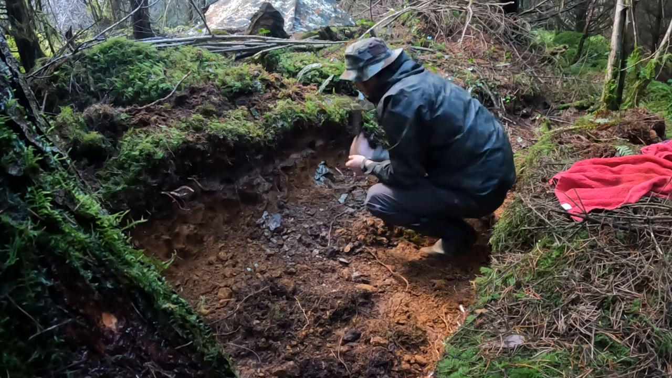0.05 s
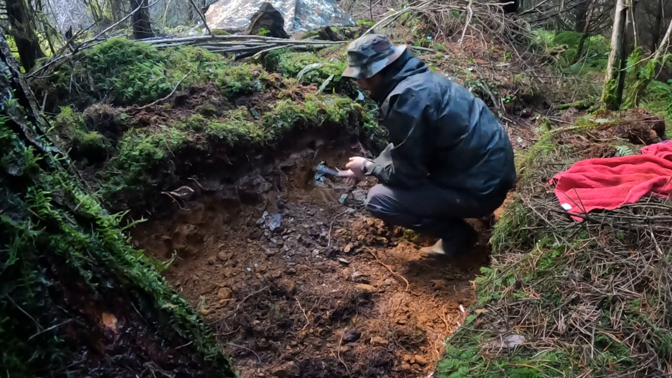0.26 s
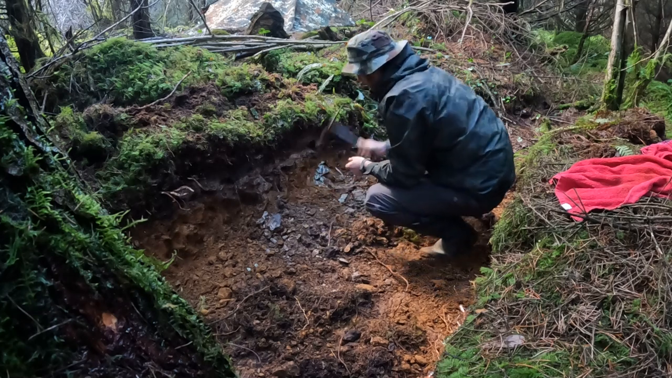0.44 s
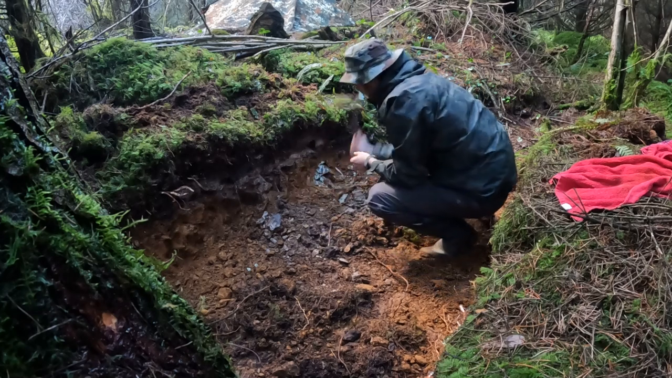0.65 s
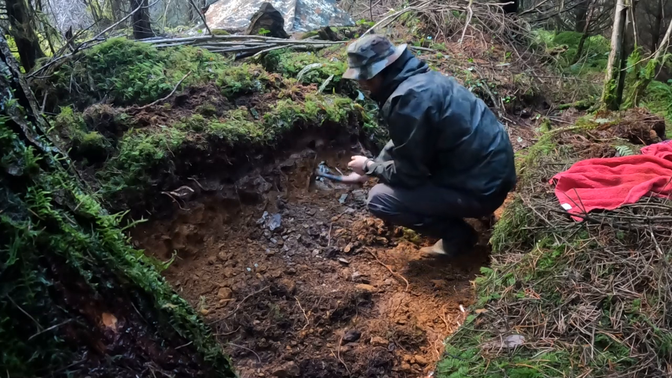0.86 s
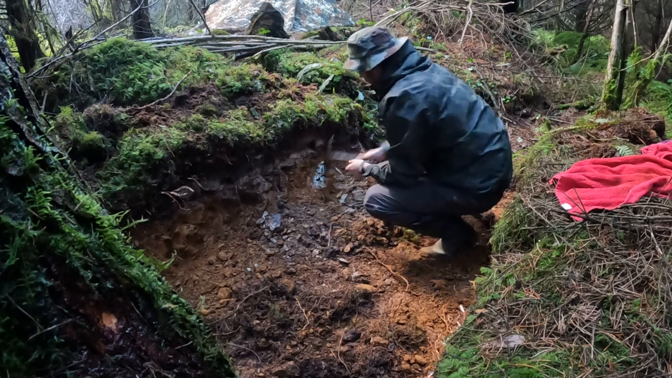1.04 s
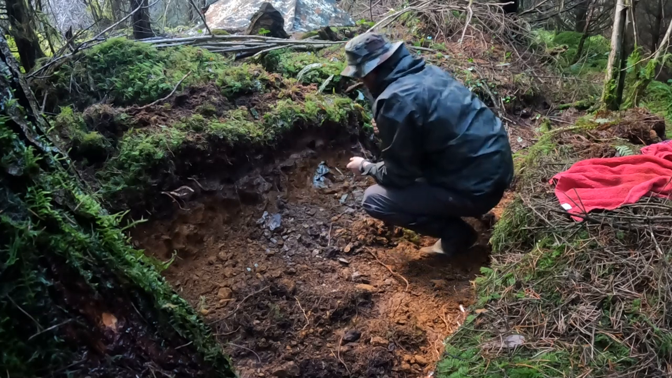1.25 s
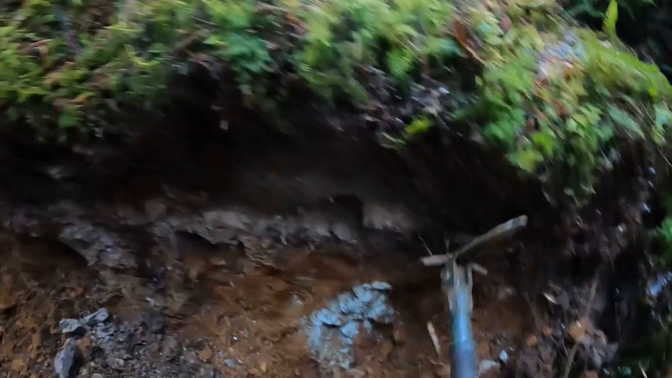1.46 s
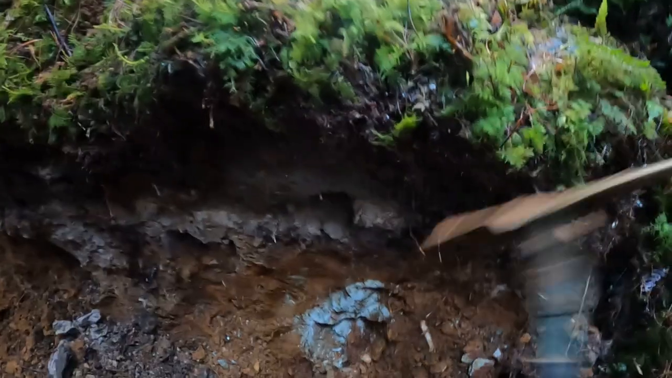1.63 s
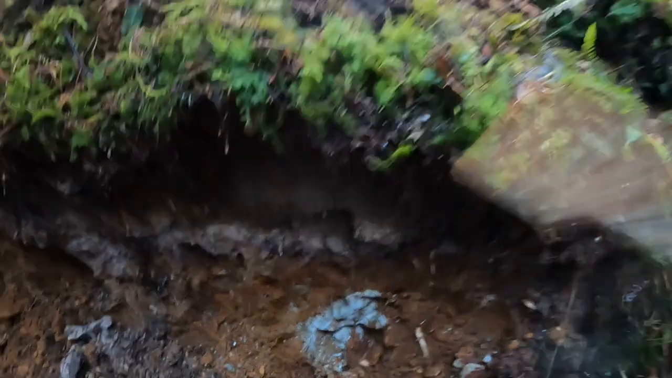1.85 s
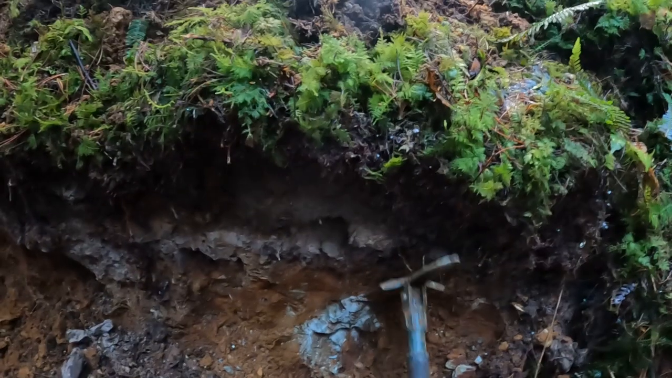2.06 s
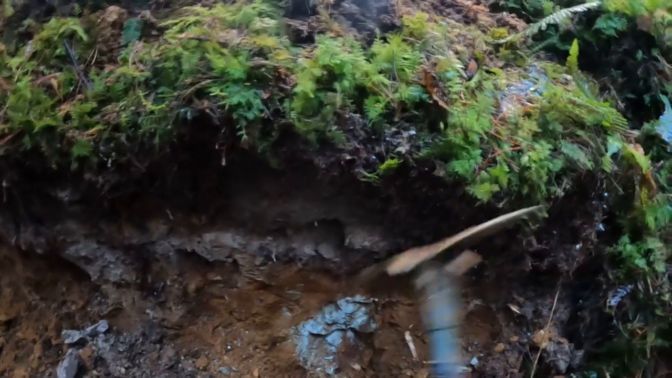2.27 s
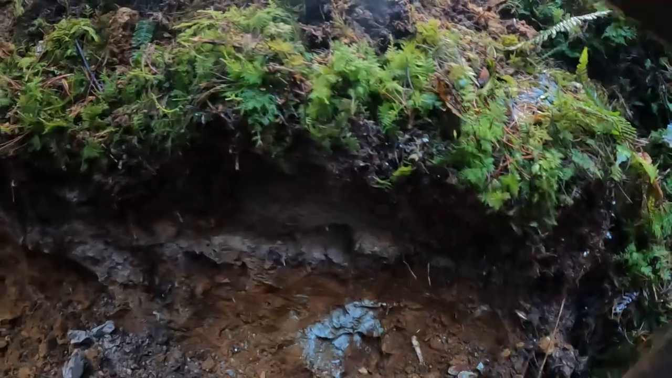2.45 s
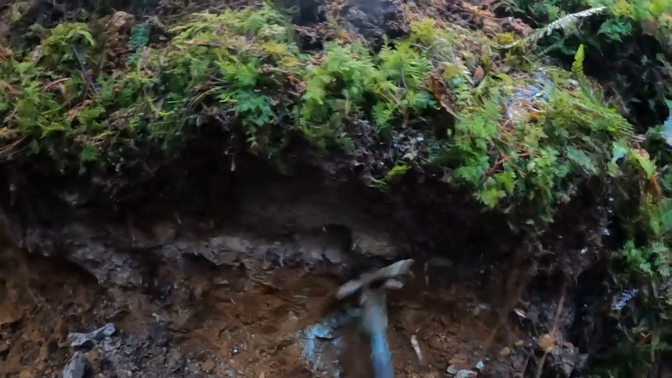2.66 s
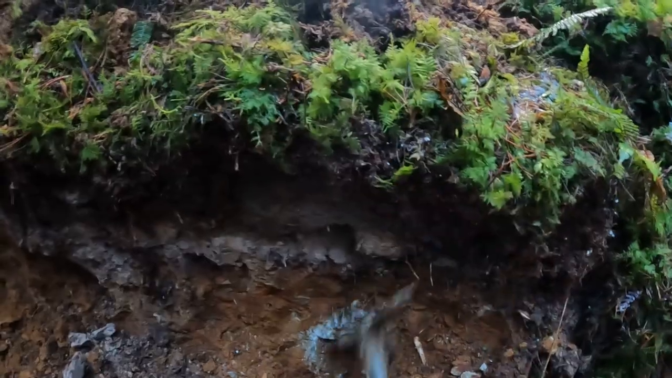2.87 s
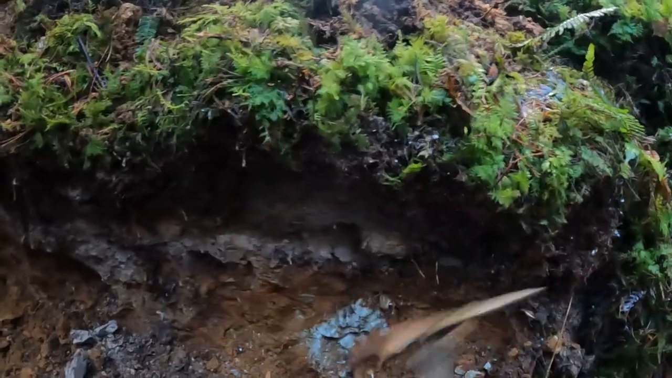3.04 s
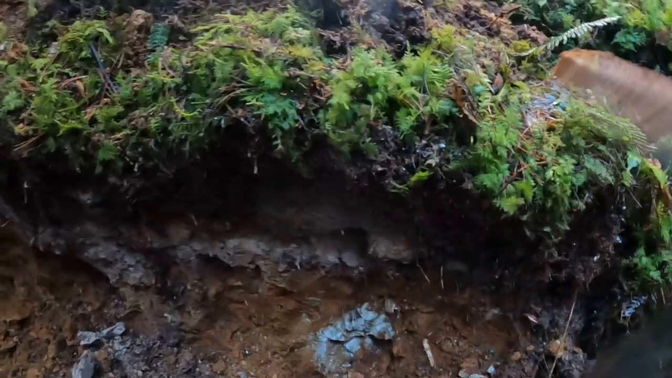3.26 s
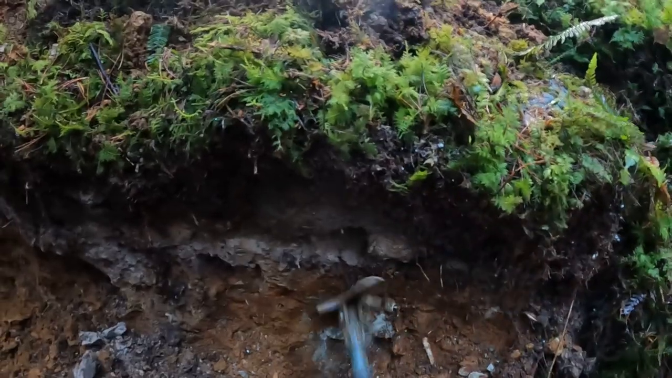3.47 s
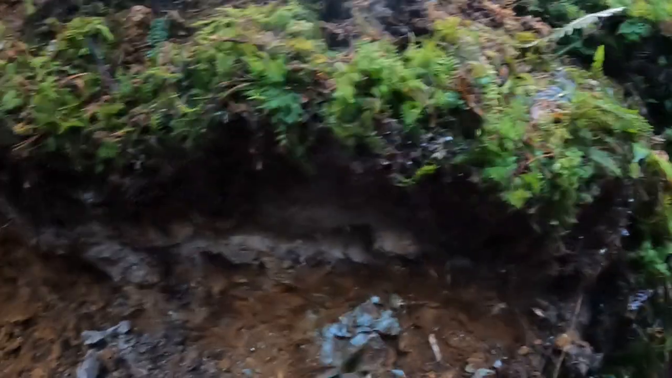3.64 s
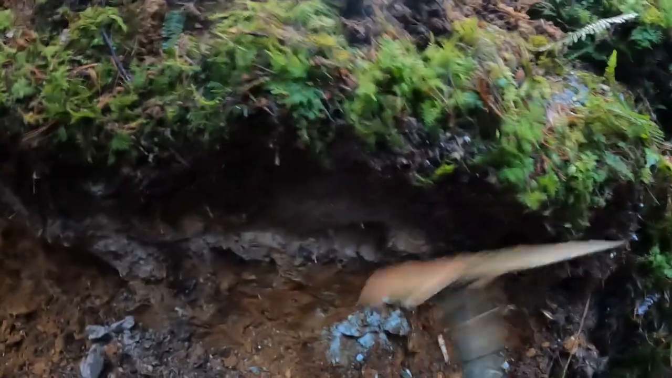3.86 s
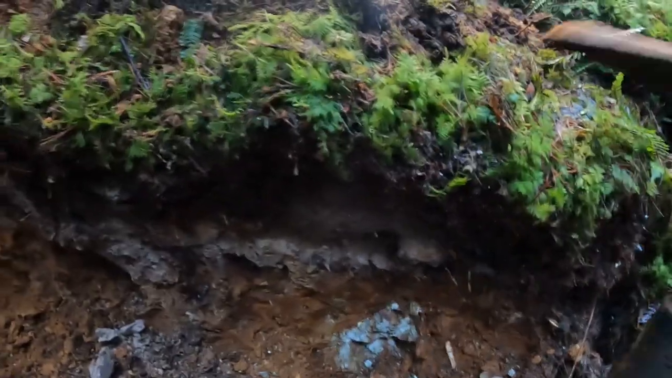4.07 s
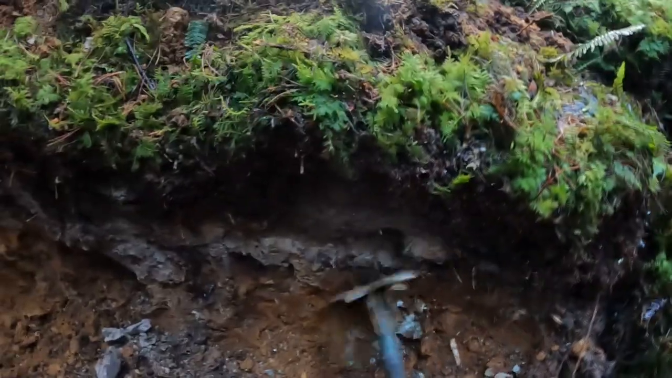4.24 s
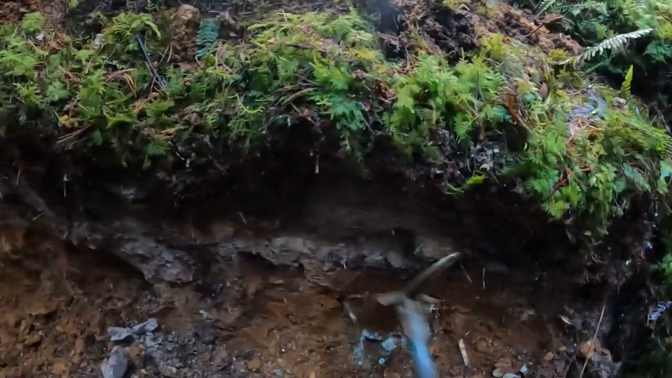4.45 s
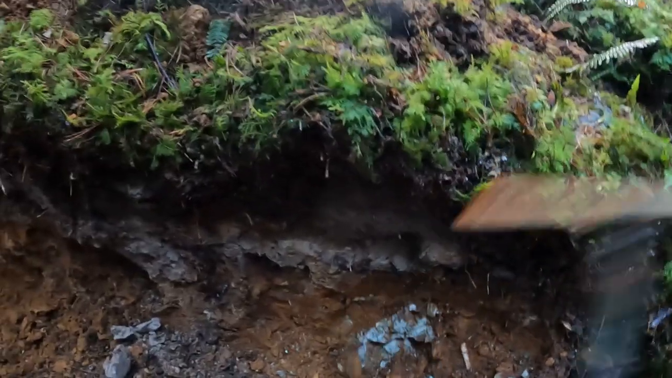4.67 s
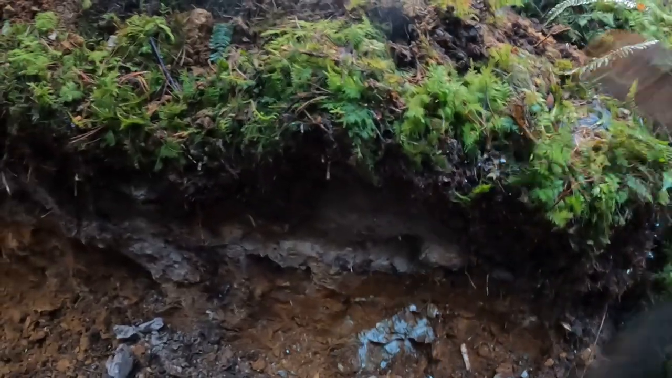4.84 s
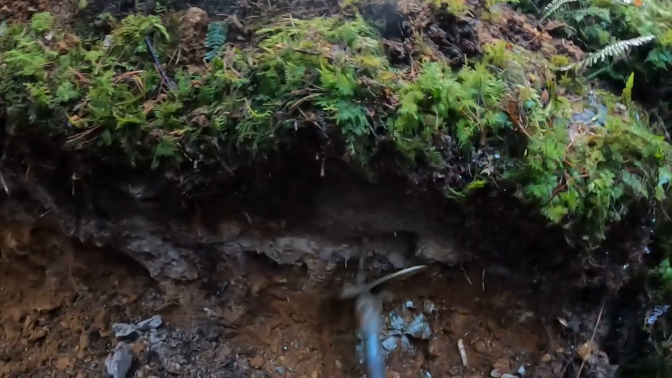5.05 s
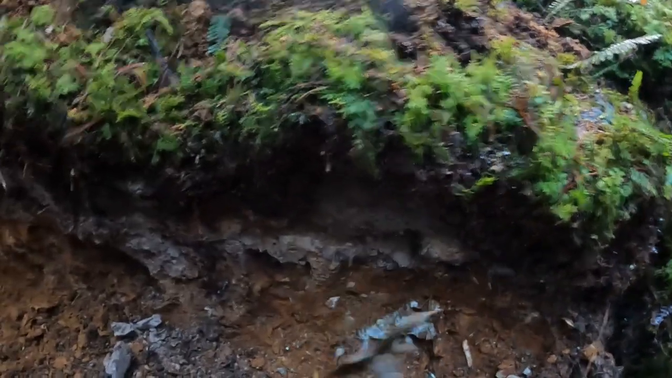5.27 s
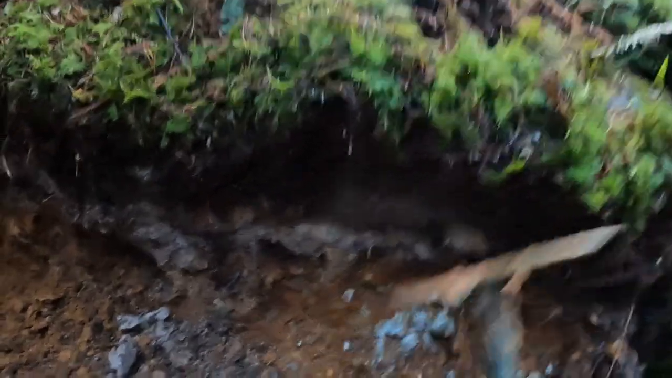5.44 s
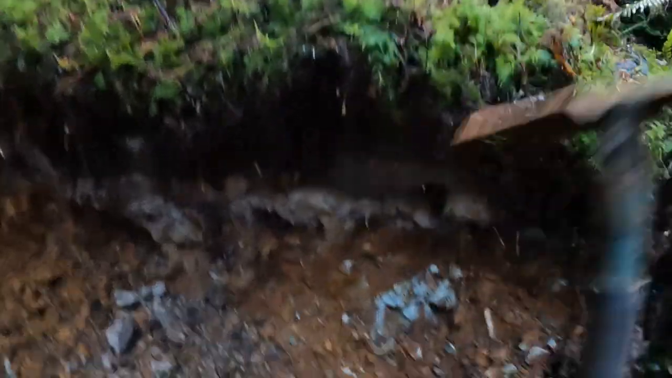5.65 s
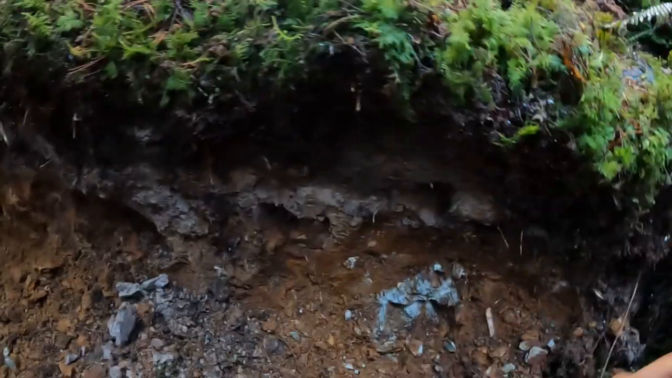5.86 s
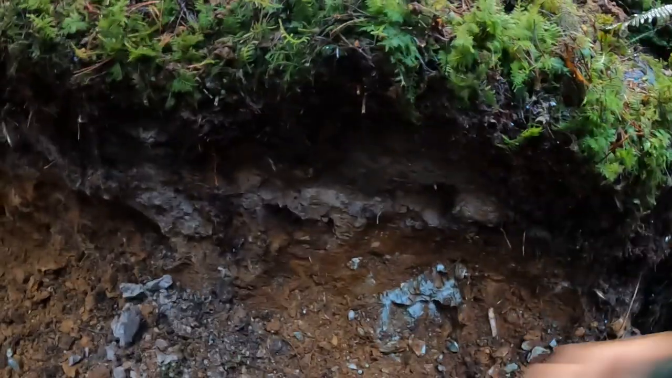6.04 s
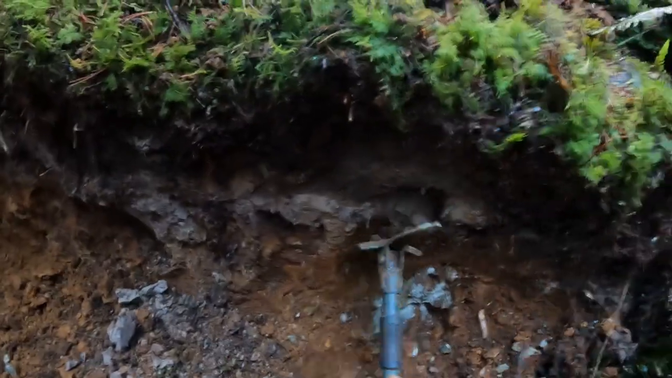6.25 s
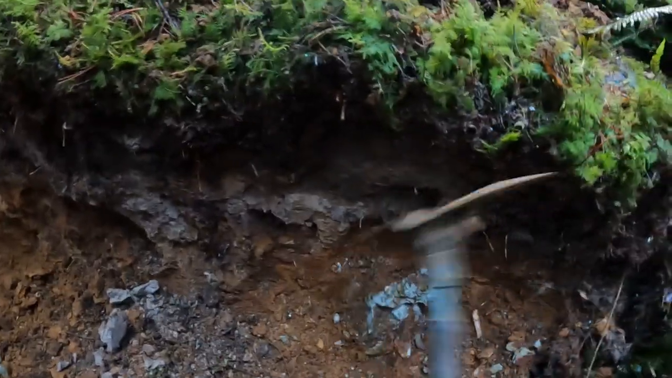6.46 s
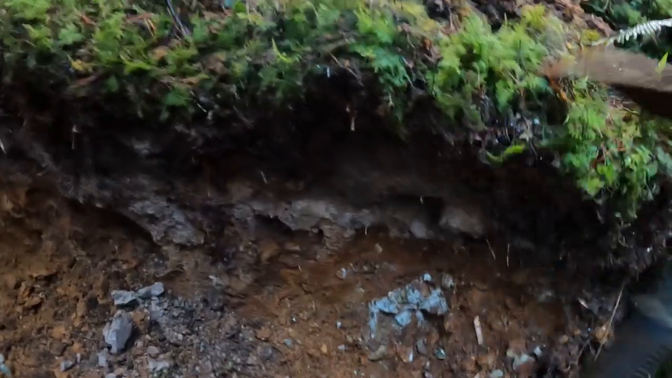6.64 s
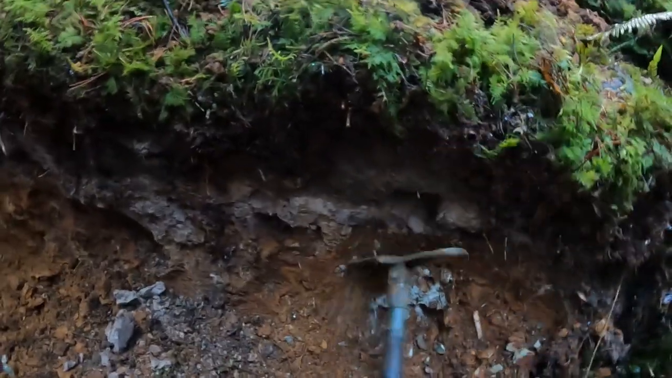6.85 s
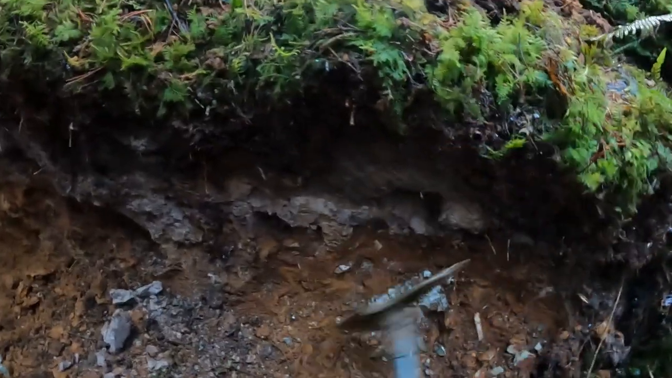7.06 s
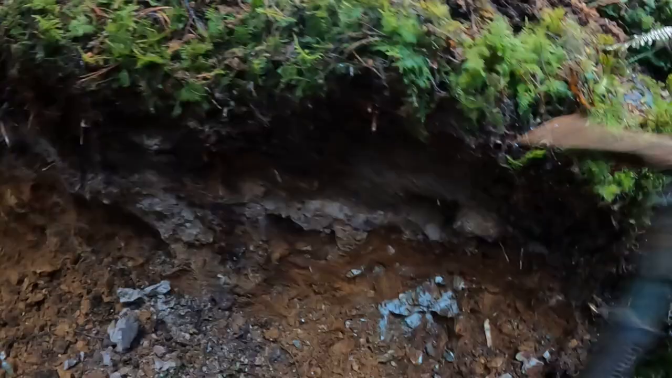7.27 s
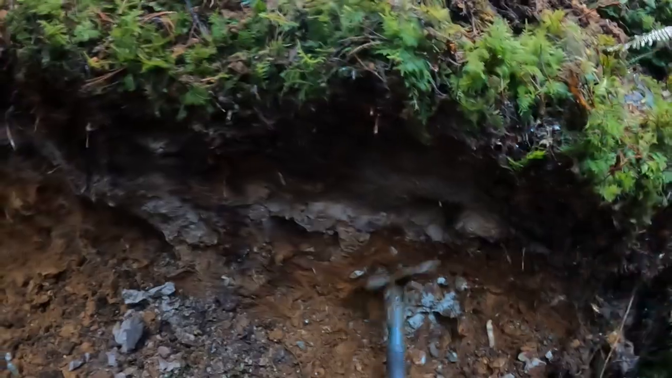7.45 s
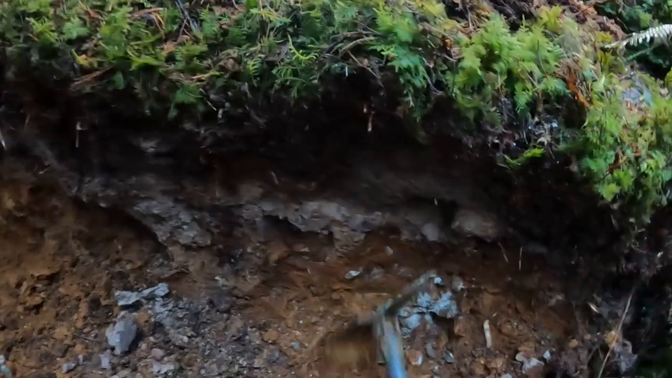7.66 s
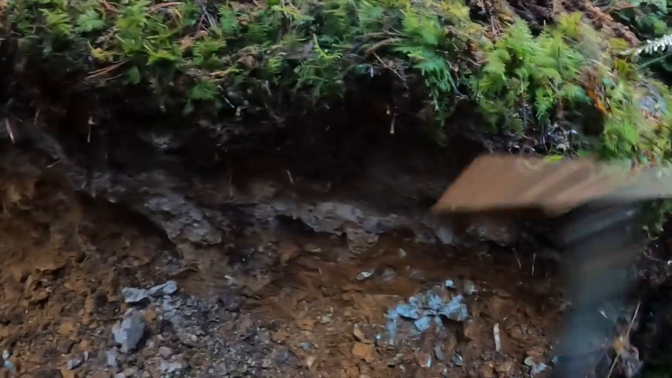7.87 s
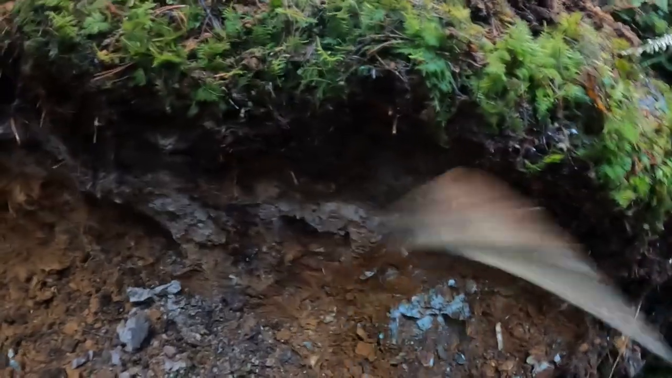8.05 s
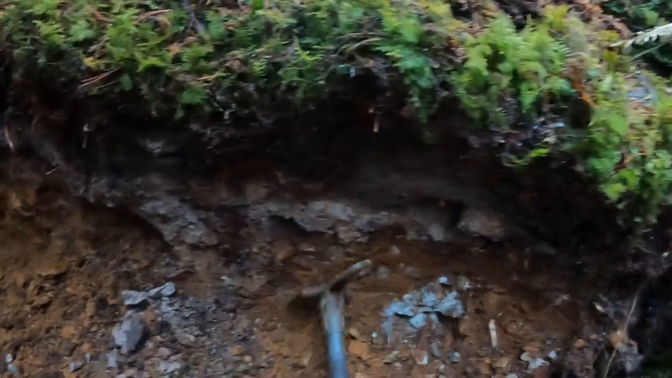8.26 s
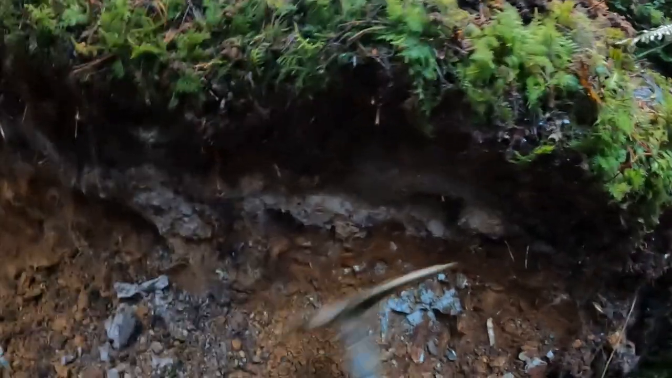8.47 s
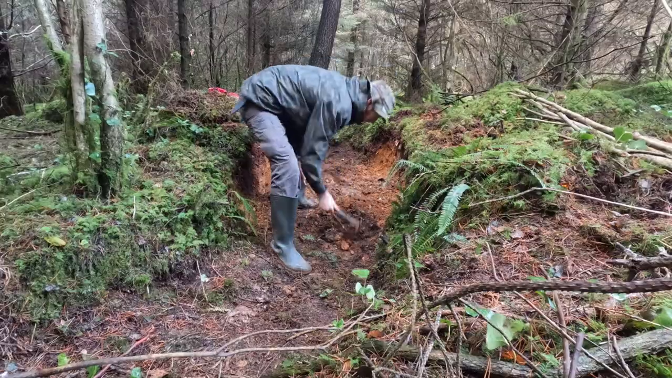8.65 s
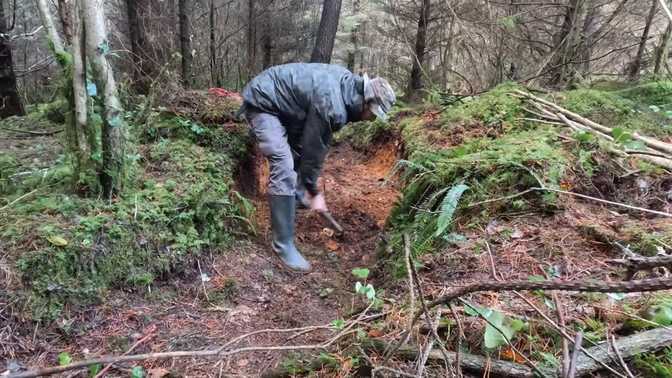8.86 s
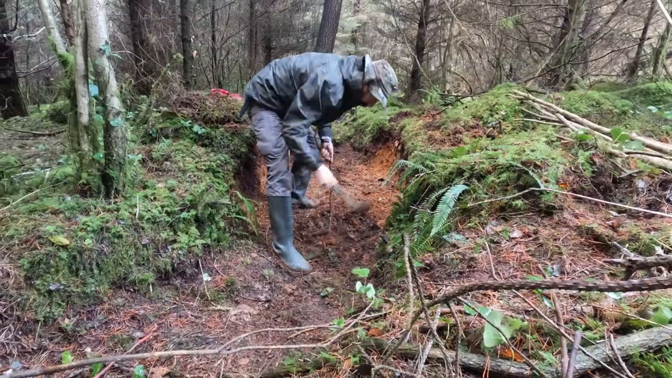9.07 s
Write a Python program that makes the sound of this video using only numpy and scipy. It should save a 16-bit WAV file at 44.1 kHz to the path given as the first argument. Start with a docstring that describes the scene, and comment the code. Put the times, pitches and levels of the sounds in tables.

```python
"""Steel chops stony soil: gritty bursts, low thuds, a few hollow booms, then the sound is cut.
A small mattock works in a forest pit, close to a stereo pocket microphone. Contacts are enveloped random
clicks filtered in four bands; thuds, booms and handle are dying sines. Filtered noise makes the wind rumble,
the far rush of trees, the shuddering pit, and the swish of cloth and loose soil."""
import sys
import numpy as np
from scipy import signal
from scipy.fft import rfft, irfft, next_fast_len
from scipy.io import wavfile

SR = 44100
rng = np.random.default_rng(int(sys.argv[2]) if len(sys.argv) > 2 else 0)


def output_pcm(signal):
    """Save a mono or channel-first signal as 16-bit PCM at the path in sys.argv[1].

    Samples are clipped to [-1, 1] before scaling.
    """
    pcm = np.clip(np.atleast_2d(signal).T, -1, 1) * 32767
    wavfile.write(sys.argv[1], SR, np.round(pcm).astype(np.int16))


N = 401751

# Levels of the air noise as heard, sinking after a loud blow late on (8.23 s) where the recorder's gain dips:
# (time [s], wind rumble [dB], low murmur [dB], far rush [dB])
AIR_LEVELS = [(0.0, -31, -40.5, -44), (1.29, -30, -43.5, -43), (1.48, -28.5, -44, -46.5),
              (2.44, -33.5, -48.5, -48), (2.82, -26, -40.5, -45), (3.4, -34.5, -46.5, -44),
              (3.57, -26, -41.5, -52), (3.71, -21.5, -47.5, -46), (4.05, -36.5, -48.5, -46.5),
              (4.48, -26.5, -43.5, -46), (4.86, -36.5, -44, -43.5), (5.13, -25, -41.5, -48.5),
              (5.51, -32.5, -45, -45.5), (6.2, -28.5, -46.5, -46.5), (7.5, -31.5, -46, -48.5),
              (7.8, -24, -41.5, -44), (8.16, -30.5, -43, -49.5), (8.3, -27, -53, -59),
              (8.48, -27.5, -44.5, -48.5), (8.64, -30.5, -42.5, -47.5)]
# Noise spectra, each scaled to rms 1 after shaping: (frequency [Hz], relative level [dB per Hz])
RUMBLE_SPECTRUM = [(10, -29), (22, -4), (32, -8), (43, -5.5), (60, -7.5), (78, -18.5), (100, -39),
                   (130, -62.5)]
MURMUR_SPECTRUM = [(60, -31.5), (100, -2.5), (200, -10), (400, -14), (600, -24.5)]
RUSH_SPECTRUM = [(300, -26), (480, -8), (740, -6.5), (900, -5.5), (1050, -4.5), (1250, -7), (1600, -13),
                 (2300, -18.5), (3500, -48.5)]
HUSH_SPECTRUM = [(700, -19.5), (900, 0), (1050, 0), (1250, -6.5), (1700, -13), (2200, -29)]   # narrower far noise in the first moments
GRIND_SPECTRUM = [(900, -11), (1500, -2), (2300, -7.5), (3200, -9), (4500, -56)]   # lowest part of the swishes
HISS_SPECTRUM = [(2000, 10), (3200, 14.5), (4500, 14), (6500, 8.5), (8000, 6.5), (10000, -54)]   # main part of the swishes
SIZZLE_SPECTRUM = [(5000, -33), (7500, -3), (10000, -6.5), (12800, -9), (15000, -28), (16500, -56)]   # top of the swishes
SHAKE_SPECTRUM = [(50, -25.5), (80, 0.5), (150, -1), (230, -9.5), (400, -31.5)]   # the pit shuddering after a blow
# Stereo likeness of all these noises: (frequency [Hz], left-right likeness [0-1])
NOISE_LIKENESS = [(25, .9), (60, 1), (180, 0.95), (550, 0.84), (1650, 0.62), (4970, 0.78), (15000, 0.3)]
# Stereo leaning of all these noises: (frequency [Hz], left minus right [dB])
NOISE_LEANING = [(25, -2.5), (60, -0.5), (180, -0.5), (550, 2.5), (1650, 2.8), (4970, 0.4), (15000, 4)]
# Cloth swishes and soil slides with each move of the arm: (middle [s], half length [s], hiss level [dB])
SWISHES = [(0.184, 0.025, -52), (0.315, 0.045, -47), (.52, 0.049, -60), (0.926, 0.059, -46.5),
           (1.205, 0.079, -56.5), (1.46, 0.074, -55.5), (1.71, 0.041, -45.5), (1.93, 0.068, -44),
           (2.155, 0.028, -50.5), (2.38, 0.045, -51.5), (2.571, 0.057, -48), (2.826, 0.11, -48),
           (3.069, 0.059, -44.5), (3.325, 0.076, -46), (3.655, 0.064, -42.5), (3.934, 0.081, -54),
           (4.154, 0.067, -48.5), (4.397, 0.076, -46), (4.695, .07, -47.5), (4.85, 0.054, -44.5),
           (5.03, 0.054, -51), (5.174, 0.065, -48), (5.4, 0.072, -50.5), (5.99, 0.095, -55.5),
           (6.155, 0.07, -56.5), (6.34, 0.071, -48.5), (6.6, 0.063, -50.5), (6.797, 0.066, -47),
           (7.076, 0.062, -43), (7.232, 0.041, -49.5), (7.42, .04, -47), (7.64, 0.096, -44.5),
           (7.847, 0.052, -44), (8.036, 0.063, -42.5), (8.52, 0.076, -51)]
# Body, middle, bright and top bands of the grit: (low edge [Hz], high edge [Hz])
GRIT_BAND_EDGES = [(330, 1200), (1200, 4200), (4200, 7400), (7400, 11800)]
# Handle and blade colouring the grit: (band [index], frequency [Hz], sharpness [Q], level against band [dB])
TOOL_RESONANCES = [(0, 537, 1.4, -8.5), (1, 1433, 8.5, -15), (2, 5460, 9.8, -8)]
# Pebbles tick: (time [s], middle band [dB], stone ring [Hz], body and bright against middle [dB, dB])
PEBBLES = [(0.1704, -30, 3640, -13, 6), (0.353, -28.5, 1950, -8, -9.5), (0.7602, -30, 4500, -17, -3),
           (0.991, -27.5, 1450, -12, -27), (1.027, -38, 1210, 12, -14), (1.136, -44, 1250, 5, -6),
           (1.4829, -34.5, 1220, -20, -15), (2.154, -29, 3850, -25, 1), (2.331, -35.5, 2680, -13, -25),
           (2.7763, -30.5, 3380, -19, -6), (2.851, -30, 4590, -13, 1), (2.862, -31, 4670, -10, 4),
           (2.926, -24, 1250, -10, -3), (3.03, -34, 1280, -2, -19), (3.0548, -24, 1200, 4.5, -18),
           (3.1286, -30, 1680, -12, -30), (3.5225, -36, 3330, -13, -3), (3.549, -23, 3370, -21, -18),
           (3.561, -30, 4000, -17, -17), (4.39, -35, 2560, -7, -2), (4.494, -25.5, 1940, -10, -23),
           (4.523, -34, 1940, -15, -11), (4.596, -36, 2520, -13, -25), (4.614, -35, 2640, 3, -24),
           (5.1144, -45, 4000, -9, 2), (5.2723, -32.5, 2510, -12, -20), (5.2852, -26.5, 3100, -6, -28),
           (5.537, -37.5, 1260, -17, -0.5), (5.9785, -45, 1240, 1, -1), (6.3366, -33, 4260, -10, -7),
           (6.389, -49, 4000, -10, 5), (6.4527, -23, 4150, -21, -7), (6.5575, -35, 1380, -11, -17),
           (7.064, -31, 3470, 1, -12), (7.5364, -36, 3810, -11, -4), (7.669, -35, 1420, -10, -15),
           (7.757, -32, 1220, 1, -13), (7.825, -30, 1570, -9, -16), (7.94, -33, 1340, -19, -24),
           (8.177, -36, 1640, 0, -9)]
# The blade grinds or drags through grit:
# (time [s], middle band [dB], stone ring [Hz], attack [s], t60 [s], bright against middle [dB])
DRAGS = [(0.265, -26, 1780, 0.0022, 0.083, 0.5), (1.578, -44.5, 2980, 0.0081, 0.14, -3.5),
         (1.601, -40.5, 2490, .007, 0.062, -14), (2.0492, -30.5, 1950, 0.0043, 0.041, -4),
         (2.057, -23, 1460, 0.0065, .018, -4), (2.241, -45, 2060, .006, 0.17, 0),
         (2.2688, -46, 1210, 0.006, .034, -2), (2.734, -22.5, 1310, 0.0099, 0.056, -6.5),
         (2.8785, -31, 2350, .005, 0.14, -4), (2.8882, -24.5, 2320, 0.007, 0.047, -7.5),
         (2.8992, -35, 2260, 0.0079, .027, -8), (3.4895, -19.5, 2140, 0.0087, .011, -5),
         (3.5852, -30.5, 3520, 0.0037, 0.08, -4.5), (3.609, -29, 1210, 0.0044, 0.044, -19),
         (3.7038, -26, 1190, .002, 0.065, -13), (3.7198, -34, 2700, 0.0096, 0.04, -8),
         (4.333, -14.5, 1710, 0.0089, 0.012, -24), (4.498, -33, 2760, 0.0045, 0.013, -11),
         (4.5274, -41.5, 2300, .008, 0.038, -8), (4.5093, -41, 2410, .008, .04, -11),
         (5.0668, -12, 1760, 0.01, 0.042, -14), (5.149, -32.5, 2730, 0.016, .06, -11),
         (5.1672, -28, 2620, 0.0053, 0.08, -12), (5.1855, -29, 2680, .004, 0.044, -9),
         (5.1937, -31, 2700, 0.0073, 0.019, -11), (6.277, -25, 2010, .004, 0.044, -1),
         (6.2872, -11.5, 1900, 0.01, .006, -18), (6.3013, -16.5, 2800, 0.0063, 0.012, -21),
         (6.3404, -34, 2070, .002, 0.063, -13), (6.4347, -34.5, 2800, 0.0027, 0.17, -8),
         (6.4556, -40, 2840, 0.01, .02, -19), (6.9082, -12, 1900, 0.01, .025, -3.5),
         (6.92, -24, 1900, 0.0083, .017, -8), (6.93, -15, 2320, 0.0044, 0.013, -9),
         (6.99, -36, 2600, 0.012, .05, -4), (7.0253, -32, 2510, .011, .02, -16),
         (7.077, -30, 2480, .002, 0.098, -9), (7.084, -30.5, 1350, 0.0034, 0.035, -8),
         (7.091, -36, 1530, 0.0043, 0.024, -7), (7.6466, -18, 1880, .004, 0.0073, -32),
         (7.672, -32, 1200, 0.0035, 0.1, -10), (7.6903, -25.5, 1080, 0.0037, 0.051, -19),
         (7.6957, -25, 1210, 0.0088, 0.024, -3), (7.9724, -41, 1490, .02, .09, -10),
         (7.9941, -42, 1550, .025, 0.1, -10), (8.0243, -39, 2040, 0.019, 0.2, -18),
         (8.374, -42, 2980, 0.0069, 0.065, -10), (8.3987, -48, 1420, .01, .09, -12),
         (8.417, -46, 3640, .006, 0.045, 2)]
# Steel cracks into stone; the last row is a long, dull drag:
# (time [s], middle band [dB], stone ring [Hz], t60 [s], body and bright against middle [dB, dB])
CRACKS = [(0.271, -6.5, 1460, 0.015, -11, -18), (0.869, -5.5, 1400, 0.02, -16.5, -5.5),
          (2.0657, -6.5, 2020, 0.012, -3, -27), (2.7256, -17, 1250, 0.047, -7.5, -4.5),
          (2.731, -8.5, 1080, 0.026, -8.5, -23), (3.487, -17.5, 1940, .006, 1, -21),
          (3.4994, -8, 2590, 0.014, -1.5, -14.5), (3.6238, -21.5, 1430, 0.0076, 3, -18),
          (3.6401, -10, 2880, 0.014, -12, -7.5), (3.668, -13, 1310, 0.027, 2, -5),
          (4.337, -20.5, 2200, 0.049, -7, -2), (4.3472, -4.5, 2070, 0.018, -4, -42),
          (5.0468, -16.5, 1240, 0.011, -10, -2), (5.055, -11.5, 1890, 0.063, -7, -13.5),
          (5.0856, -9.5, 2560, 0.026, -13, -32), (6.273, -13.5, 4100, 0.024, -4.5, -17),
          (6.285, -16.5, 1710, 0.082, -7.5, -11.5), (6.9027, -20, 1150, 0.041, -11, -11),
          (6.9387, -8, 2700, 0.0091, -16, -15), (7.022, -24, 2460, 0.043, -1, -2),
          (7.5502, -9.5, 1730, 0.034, -9.5, -11), (7.6438, -11.5, 1530, 0.0077, -15, -36),
          (7.652, -11, 1870, 0.0077, -17, -34), (7.6861, -20, 1300, 0.059, -30.5, -20),
          (8.188, -0.5, 1570, 0.0054, -13, -12.5), (8.2065, -28, 2480, 0.047, 2, -2),
          (8.2251, -5.5, 1560, 0.01, -5.5, -32), (8.4576, -10.5, 2560, .01, 0, -34),
          (8.4788, -21, 1580, 0.0081, -8.5, -29.5), (8.483, -45.5, 1430, 0.22, 14, -20.5)]
# The blade is set down on a stone before a stroke:
# (time [s], middle band [dB], bright against middle [dB], handle [dB])
TOUCHES = [(1.975, -12, -1.5, -23.5), (2.635, -11.5, -4.5, -15.5), (3.3936, -10, -4.5, -21),
           (4.964, -14, -1.5, -23.5), (6.2033, -11, -10.5, -20.5), (6.8255, -10.5, -4.5, -21),
           (7.4564, -13, 1, -25.5), (8.0916, -13, -2, -26.5)]
# Thuds in the ground: (time [s], swing [dB], frequency [Hz], t60 [s])
STROKE_THUDS = [(0.2769, -2.5, 99, 0.02), (0.874, 8, 136, .017), (2.0664, 11, 62.5, 0.023),
                (2.7313, -6, 58, 0.098), (2.7424, 4.5, 62.6, 0.026), (2.748, -8, 202, 0.036),
                (3.5015, 8.5, 75, 0.023), (3.6401, 12, 84, 0.017), (4.347, 6.5, 116, 0.013),
                (4.3551, -13, 122, 0.024), (4.7834, -12.5, 190, 0.024), (5.064, -4.5, 171, 0.048),
                (5.0779, -6, 127, 0.078), (5.095, 4.7, 131, 0.018), (6.292, 2.5, 150, .018),
                (6.3129, 4.5, 144, 0.022), (6.9217, -4.5, 173, 0.03), (6.9332, 5.5, 190, 0.013),
                (7.5545, 3.5, 111, 0.012), (7.5705, 0, 60.7, 0.021), (7.556, -9, 308, 0.035),
                (8.1926, -4, 140, 0.077), (8.2095, -9, 109, 0.058), (8.2292, -1.5, 177, 0.067)]
# Modes of something hollow: (frequency [Hz], t60 [s], left minus right [dB])
HOLLOW_MODES = [(103.9, 0.59, -3.5), (253, 0.3, -0.5), (283.8, 0.21, -12.5), (55.3, 0.24, -2),
                (140, 0.22, -2)]
# Knocks on the hollow thing: (time [s], then the level of each of its modes [dB])
HOLLOW_KNOCKS = [(3.505, -40.5, -25, -47.5, -31.5, -40), (3.628, -11.5, -48, -59, -18, -33),
                 (3.669, -7, -46, -31, -3, -30), (8.233, -45, -23.5, -49, -31.5, -40),
                 (8.4597, -3, -40, -9, -8.5, -11), (8.48, -43, -47, -13, -23, -28)]
# Modes of the wooden handle: (nominal frequency [Hz], level against the knock [dB], t60 [s])
HANDLE_MODES = [(534, 0, 0.041), (1407, -9, 0.059)]
# Soft knocks on the handle alone: (time [s], level [dB])
HANDLE_NUDGES = [(2.335, -34), (3.056, -29), (6.566, -31.5)]
# Phase between the microphone ports: (frequency [Hz], lead of the left port [rad])
LEFT_PORT_LEAD = [(0, 0.083), (3100, -0.19), (4820, -0.3), (9560, -0.37), (16400, -0.099)]

HUSH_DB, HUSH_END_S, HUSH_FADE_S = -43.5, 1.46, 0.027   # it ends when the microphone moves into the pit
STILL_DB, GRIND_DB, SIZZLE_DB = -58.5, 0.5, -10.5   # hiss between swishes; grind and sizzle against the hiss
TOUCH_ATTACK_S, TOUCH_T60_S, TOUCH_HZ, TOUCH_BODY_DB, TOUCH_LEFT_DB = 0.00045, 0.012, 2750, -16.5, -3.5
TOUCH_TOP_DB = -0.5   # added to the top band of the touches
CRACK_ATTACK_S, CRACK_LEFT_DB = 0.00045, -1
DRAG_BODY_DB, DRAG_LEFT_DB = -8, -1.5
PEBBLE_ATTACK_S, PEBBLE_T60_S, PEBBLE_LEFT_DB = 0.00072, 0.011, -1
TOP_DB = -9.5   # top band against the middle one, before the bright level is added
HARD_SHARPNESS, LOOSE_SHARPNESS = 6.0, 6.8   # Q of stone under the blade; of dragged and falling stones
TAP_LATE_S, TAP_DB, TAP_HZ, TAP_T60_S = 0.005, 3, 155, 0.021   # small thud under a touch; dB against the touch
THUD_LEFT_DB = -0.5
DUCK_FROM_DB, DUCK_SHARE = -9.5, 0.27   # threshold; dB of cut per dB above it
DUCK_SMOOTH_S, DUCK_BACK_DB_PER_S = 0.038, 145   # smoothing of the cut; fall of the held excess
ROLL_OFF_HZ, CUTOFF_HZ = 12000, 16800   # gentle dulling of the microphone; steep upper limit
END_S = 8.6455   # the sound stops here


def amp(db):
    """Convert dB to gain."""
    return 10 ** (np.asarray(db) / 20)


def rms_one(x):
    """Scale to rms 1."""
    return x / np.sqrt(np.mean(x ** 2) + 1e-20)


def sides(left_db):
    """Give the two channel gains for a left-right difference in dB."""
    return amp(np.multiply.outer([0.5, -0.5], left_db))


def add(track, at, sound):
    """Mix a sound into a track from a sample index on."""
    track[..., at:at + sound.shape[-1]] += sound[..., :N - at]


def in_time(rows):
    """Read the columns of a curve table sample by sample."""
    times, *columns = np.transpose(rows)
    return [np.interp(np.arange(N) / SR, times, column) for column in columns]


def at_hz(points, hz):
    """Read a spectrum on a logarithmic frequency axis."""
    point_hz, values = np.array(points).T
    return np.interp(np.log(hz), np.log(point_hz), values, left=-200, right=-200)


def drift(rate):
    """Make slow noise of spread 1: a double pole with its corner at rate [Hz], on every 40th sample."""
    pole = np.exp(-80 * np.pi * rate / SR)
    noise = rng.standard_normal(N // 40 + 2002)
    slow = signal.lfilter([1], [1, -2 * pole, pole * pole], noise)[2000:]   # drop the settling
    return np.interp(np.arange(N) / 40, np.arange(len(slow)), rms_one(slow))


def coloured(spectrum, flutter_db, rate):
    """Shape stereo noise by spectrum, likeness and leaning; its level flutters; rms 1."""
    size = next_fast_len(N)
    hz = np.maximum(np.arange(size // 2 + 1) * SR / size, 1)
    in_range = np.clip(hz, NOISE_LIKENESS[0][0], NOISE_LIKENESS[-1][0])   # both stereo tables span this
    alike = np.clip(at_hz(NOISE_LIKENESS, in_range), 0, 1)
    lean = sides(at_hz(NOISE_LEANING, in_range))
    mid, side = rfft(rng.standard_normal((2, size))) * amp(at_hz(spectrum, hz))
    pair = np.sqrt(1 + alike) * mid + np.sqrt(1 - alike) * side * [[1], [-1]]
    noise = irfft(pair * lean, size)[:, :N]
    return rms_one(noise * amp(flutter_db * drift(rate)))


def air():
    """Wind rumbles on the microphone ports; the forest murmurs and its trees rush far off."""
    rumble_db, murmur_db, rush_db = in_time(AIR_LEVELS)
    rumble = amp(rumble_db) * coloured(RUMBLE_SPECTRUM, flutter_db=1.5, rate=8.3)
    murmur = amp(murmur_db) * coloured(MURMUR_SPECTRUM, flutter_db=3.15, rate=8.0)
    rush = amp(rush_db) * coloured(RUSH_SPECTRUM, flutter_db=1.5, rate=7.3)
    return rumble + murmur + rush


def hush():
    """A wavering band of far noise fills the first moments and fades out."""
    fade = np.clip((HUSH_END_S - np.arange(N) / SR) / HUSH_FADE_S, 0, 1)
    return amp(HUSH_DB) * fade * coloured(HUSH_SPECTRUM, flutter_db=3.0, rate=12.0)


def rustle():
    """Trickling soil and rubbing cloth: swells of flickering hiss, all bands pricked by the same crumbs."""
    t = np.arange(0, N + 100, 100) / SR
    swells = sum(amp(2 * db) * np.exp(-((t - s) / half) ** 2) for s, half, db in SWISHES)
    level = np.sqrt(amp(2 * STILL_DB) + swells)   # powers add
    grind = amp(GRIND_DB) * coloured(GRIND_SPECTRUM, flutter_db=2.5, rate=240.0)
    hiss = coloured(HISS_SPECTRUM, flutter_db=1.1, rate=52.0)
    sizzle = amp(SIZZLE_DB) * coloured(SIZZLE_SPECTRUM, flutter_db=1.0, rate=60.0)
    crumbs = rms_one(amp(0.73 * drift(100.0)))
    return np.interp(np.arange(N) / SR, t, level) * (grind + hiss + sizzle) * crumbs


def contacts():
    """List all contacts as (s, attack, t60, dB, ring Hz, sharpness, body, bright, top, left-right)."""
    pebbles = [(s, PEBBLE_ATTACK_S, PEBBLE_T60_S, db, hz, LOOSE_SHARPNESS,
                body, bright, TOP_DB + bright, PEBBLE_LEFT_DB)
               for s, db, hz, body, bright in PEBBLES]
    drags = [(s, attack, t60, db, hz, LOOSE_SHARPNESS,
              DRAG_BODY_DB, bright, TOP_DB + bright, DRAG_LEFT_DB)
             for s, db, hz, attack, t60, bright in DRAGS]
    cracks = [(s, CRACK_ATTACK_S, t60, db, hz, HARD_SHARPNESS,
               body, bright, TOP_DB + bright, CRACK_LEFT_DB)
              for s, db, hz, t60, body, bright in CRACKS]
    touches = [(s, TOUCH_ATTACK_S, TOUCH_T60_S, db, TOUCH_HZ, HARD_SHARPNESS,
                TOUCH_BODY_DB, bright, TOP_DB + bright + TOUCH_TOP_DB, TOUCH_LEFT_DB)
               for s, db, bright, handle_db in TOUCHES]
    return pebbles + drags + cracks + touches


def grains(per_s, spread_db):
    """Scatter clicks of uneven size over a thin bed of dust: two sets of signs, two places."""
    hits = rng.random((2, N)) < per_s / SR
    sizes = amp(spread_db * np.minimum(rng.exponential(1, (2, N)), 4)) * hits
    dust = 0.049 * rng.standard_normal((2, 2, N))
    return sizes * rng.choice([-1, 1], (2, 2, N)) + dust


def resonate(x, hz, sharpness):
    """Ring a sound through a two-pole resonance."""
    r = np.exp(-np.pi * hz / sharpness / SR)
    return signal.lfilter([1, 0, -1], [1, -2 * r * np.cos(2 * np.pi * hz / SR), r * r], x)


def crunch(apart_db=-14, tail_db=-19, tail_t60=0.047, ring_db=7.0, top_left_db=4.5):
    """Grains break under each burst and ring in the stone and the tool; each band has its own strength."""
    out = np.zeros((2, N))
    grit = grains(per_s=6000, spread_db=4.5)
    filters = [signal.butter(3, edges, "band", fs=SR, output="sos") for edges in GRIT_BAND_EDGES]
    for s, attack, t60, db, hz, sharp, body, bright, top, left in contacts():
        at, attack, t60 = round(s * SR), max(attack, 1e-4), max(t60, 2e-3)
        length = min(int((attack + t60 + tail_t60) * SR), N - at)
        t = np.arange(length) / SR - attack
        rise = np.clip(1 + t / attack, 0, 1)
        after = np.maximum(t, 0)
        tail = amp(tail_db - 60 * after / tail_t60)   # crumbs and pit walls answer
        shape = rise * (amp(-60 * after / t60) + tail)
        one, other = np.swapaxes(grit[..., at:at + length] * shape, 0, 1)
        # grains lie a little apart, so the two channels differ
        pairs = one[:, None] + amp(apart_db) * other[:, None] * [[1], [-1]]
        # neighbouring bands take unrelated sign sets
        bands = [rms_one(signal.sosfilt(sos, pairs[k % 2])) for k, sos in enumerate(filters)]
        stone = rms_one(resonate(pairs[1], hz, sharp))
        bands[1] = rms_one(bands[1] + amp(ring_db) * stone)
        for k, tool_hz, sharpness, tool_db in TOOL_RESONANCES:
            k = round(k)
            tool = rms_one(resonate(pairs[k % 2], tool_hz, sharpness))
            bands[k] = rms_one(bands[k] + amp(tool_db) * tool)
        strength = np.sqrt(np.mean(shape ** 2))
        leaning = [left, left, left + top_left_db / 2, left + top_left_db]
        for band, band_db, lean in zip(bands, [body, 0, bright, top], leaning):
            add(out, at, amp(db + band_db) * strength * sides(lean)[:, None] * band)
    return out


def thuds():
    """List the thuds of the strokes and the small taps under the touches."""
    taps = [(s + TAP_LATE_S, db + TAP_DB, TAP_HZ, TAP_T60_S) for s, db, *rest in TOUCHES]
    return list(STROKE_THUDS) + taps


def ring(s, db, hz, t60, build=0.25):
    """Give the start index and dying sine of a struck mode; the swing builds up over a share of a cycle."""
    t = np.arange(int(t60 * SR)) / SR
    decay = amp(db - 60 * t / t60)
    return round(s * SR), decay * np.sin(2 * np.pi * hz * t) * (1 - np.exp(-t * hz / build))


def ground():
    """Thuds are single damped swings of the ground; the hollow thing rings on in several modes."""
    out = np.zeros((2, N))
    for s, db, hz, t60 in thuds():
        at, swing = ring(s, db, hz, max(t60, 0.01))
        add(out, at, sides(THUD_LEFT_DB)[:, None] * swing)
    for s, *levels in HOLLOW_KNOCKS:
        for db, (hz, t60, left) in zip(levels, HOLLOW_MODES):
            at, swing = ring(s, db, hz, t60)
            add(out, at, sides(left)[:, None] * swing)
    return out


def shudder(shake_db=-25, t60=0.19):
    """Loose ground goes on shaking after every thud and knock: decaying low noise."""
    blows = np.zeros(N)
    for s, db, *rest in thuds() + list(HOLLOW_KNOCKS):   # a knock counts by its first mode
        blows[round((s + 0.008) * SR)] = amp(db) ** 2
    power = signal.lfilter([1], [1, -amp(-120 / (t60 * SR))], blows + 1e-18)
    return amp(shake_db) * np.sqrt(power) * coloured(SHAKE_SPECTRUM, flutter_db=1.5, rate=28.0)


def handle():
    """The wooden handle rings briefly in two damped modes, tuned a little differently each time."""
    out = np.zeros((2, N))
    for s, *rest, db in list(TOUCHES) + list(HANDLE_NUDGES):
        for hz, mode_db, t60 in HANDLE_MODES:
            at, swing = ring(s + TAP_LATE_S, db + mode_db, hz * rng.uniform(0.91, 1.03), t60)
            add(out, at, sides(TOUCH_LEFT_DB)[:, None] * swing)
    return out


def scene():
    """Sum all sources in and around the pit."""
    return air() + hush() + rustle() + crunch() + ground() + shudder() + handle()


def duck(x):
    """Gain control: loud blows pull both channels down, and the gain creeps back."""
    fall = DUCK_BACK_DB_PER_S * np.arange(N) / SR
    level_db = 20 * np.log10(np.abs(x).max(axis=0) + 1e-9)
    over = np.maximum(level_db - DUCK_FROM_DB, 0)
    held = np.maximum.accumulate(over + fall) - fall   # peak hold that falls steadily
    r = np.exp(-1 / (DUCK_SMOOTH_S * SR))
    return x * amp(-DUCK_SHARE * signal.lfilter([1 - r], [1, -r], held))


def record(dry):
    """The ports differ in phase, gain ducks, peaks are rounded, both spectrum ends and the time are cut."""
    size = next_fast_len(N)
    lead = np.interp(np.arange(size // 2 + 1) * SR / size, *np.transpose(LEFT_PORT_LEAD))
    left = irfft(rfft(dry[0], size) * np.exp(1j * lead), size)[:N]
    heard = duck(np.stack([left, dry[1]]))
    heard = heard / (1 + np.abs(heard) ** 6) ** (1 / 6)   # round the peaks
    heard = signal.sosfilt(signal.butter(3, ROLL_OFF_HZ, fs=SR, output="sos"), heard)
    heard = signal.sosfilt(signal.butter(1, 8, "high", fs=SR, output="sos"), heard)
    heard = heard * (np.arange(N) < END_S * SR)   # stop dead
    return signal.sosfilt(signal.cheby2(12, 70, CUTOFF_HZ, fs=SR, output="sos"), heard)


dry = scene()
out = record(dry)
output_pcm(out)
```